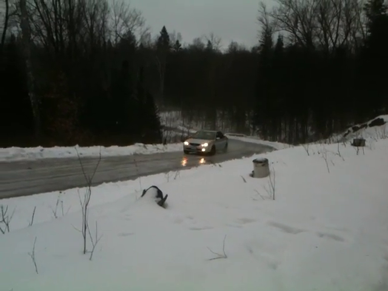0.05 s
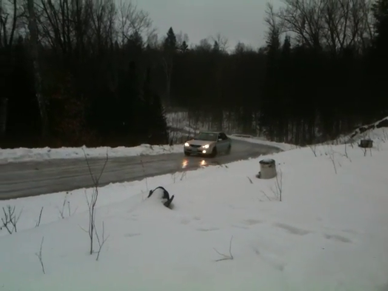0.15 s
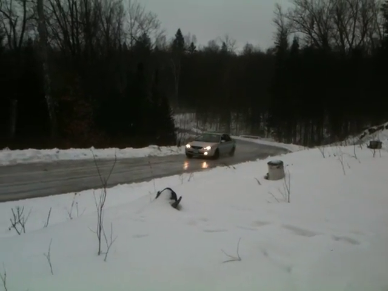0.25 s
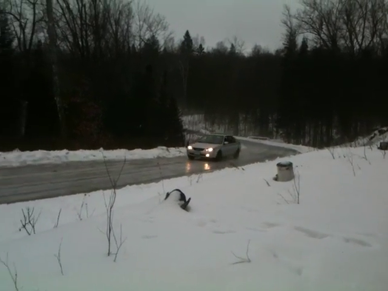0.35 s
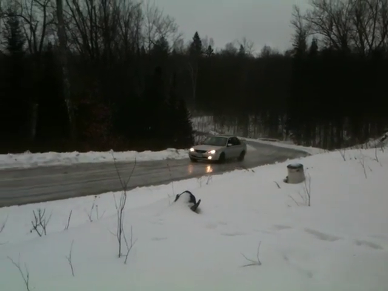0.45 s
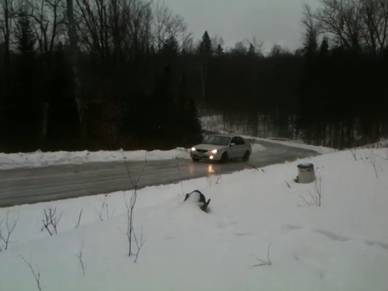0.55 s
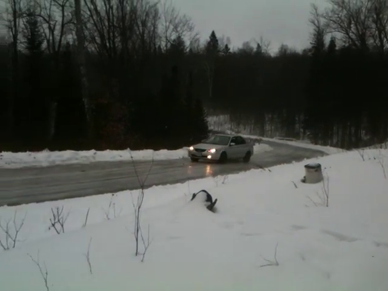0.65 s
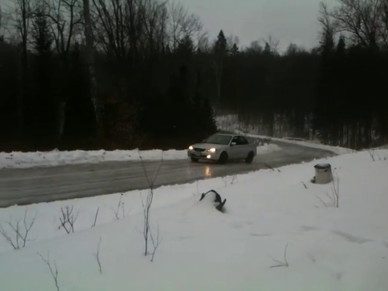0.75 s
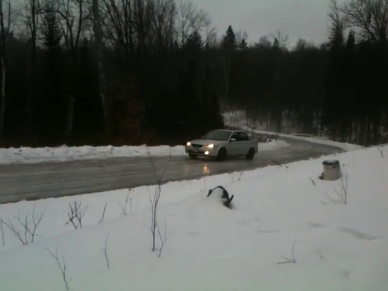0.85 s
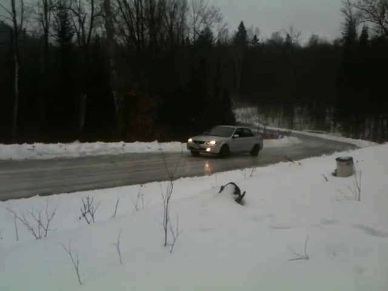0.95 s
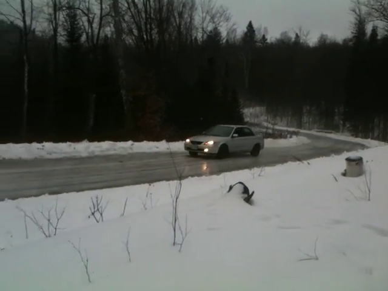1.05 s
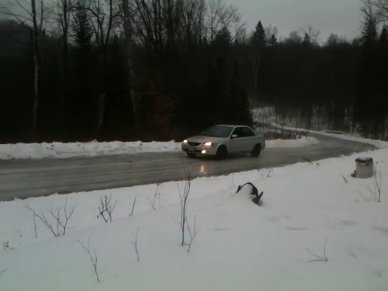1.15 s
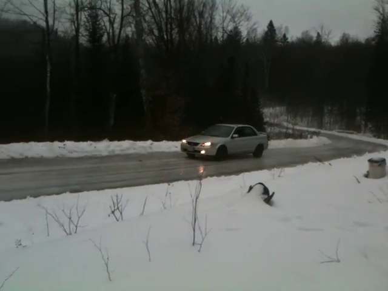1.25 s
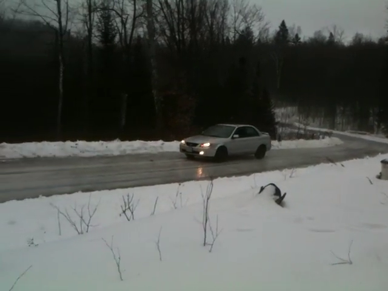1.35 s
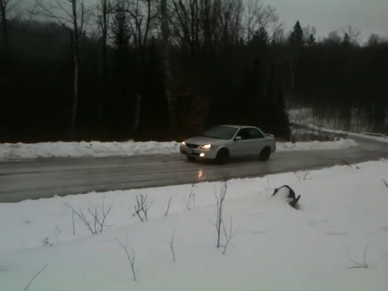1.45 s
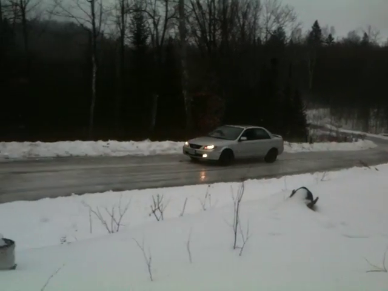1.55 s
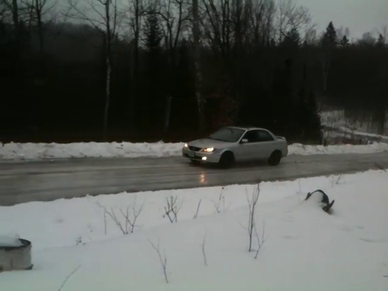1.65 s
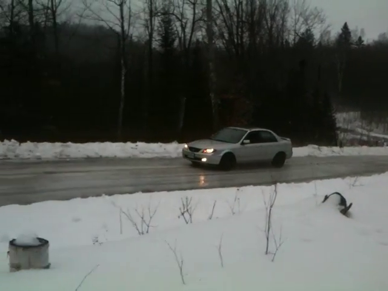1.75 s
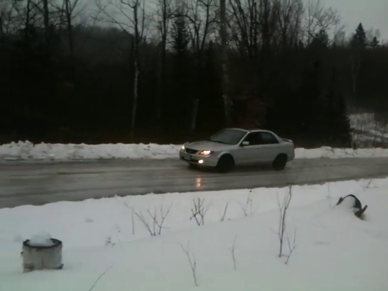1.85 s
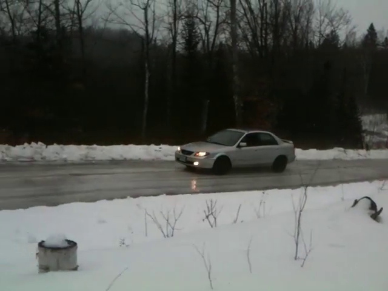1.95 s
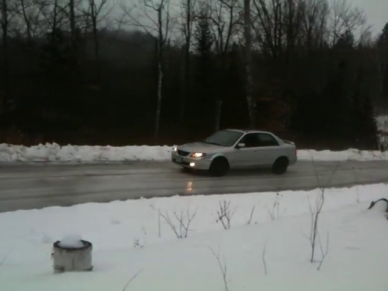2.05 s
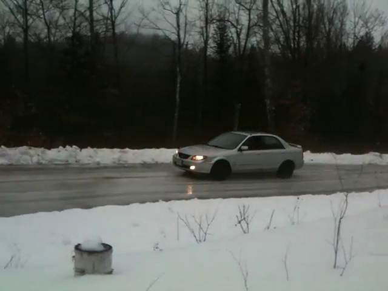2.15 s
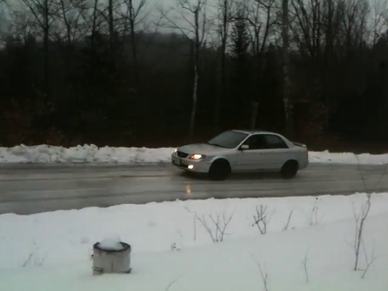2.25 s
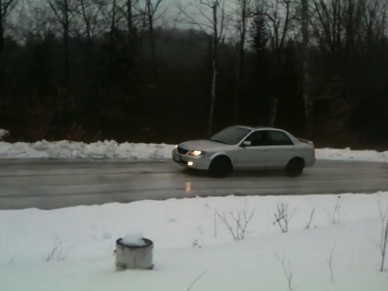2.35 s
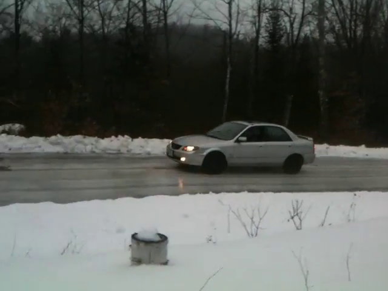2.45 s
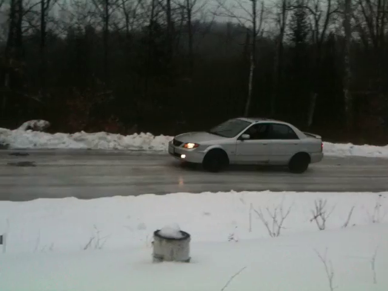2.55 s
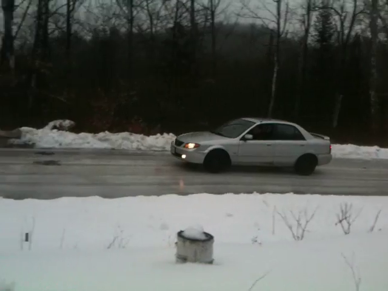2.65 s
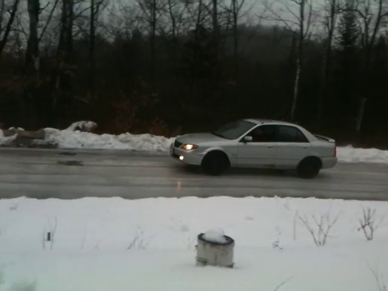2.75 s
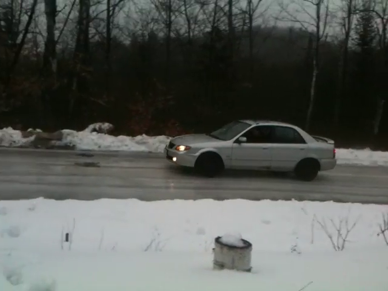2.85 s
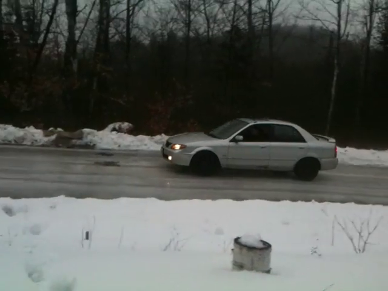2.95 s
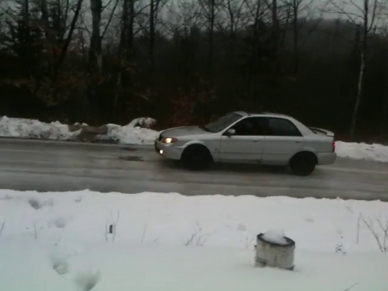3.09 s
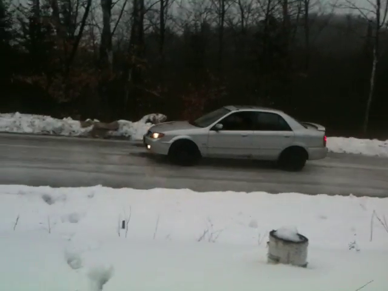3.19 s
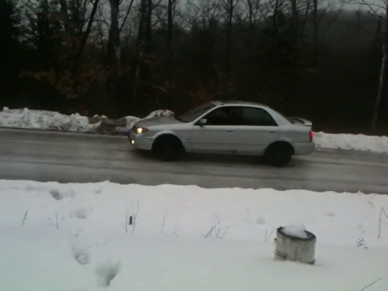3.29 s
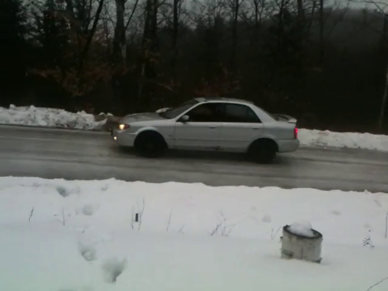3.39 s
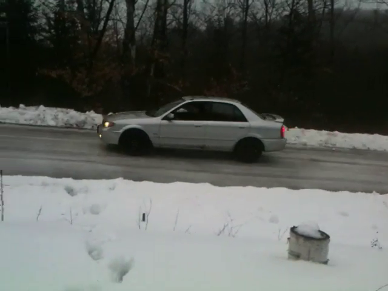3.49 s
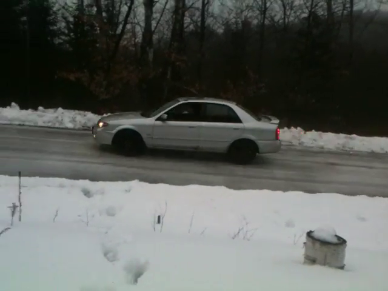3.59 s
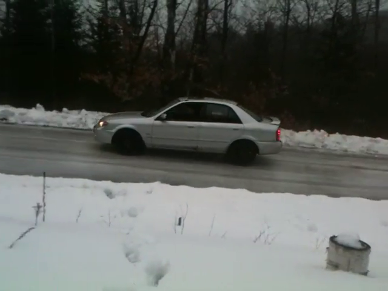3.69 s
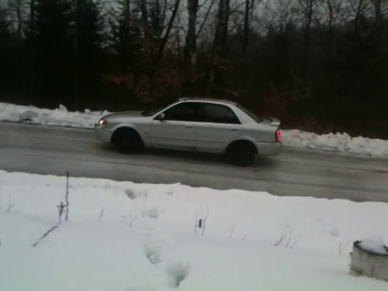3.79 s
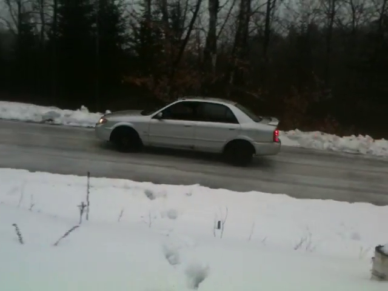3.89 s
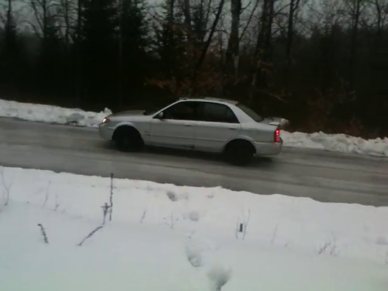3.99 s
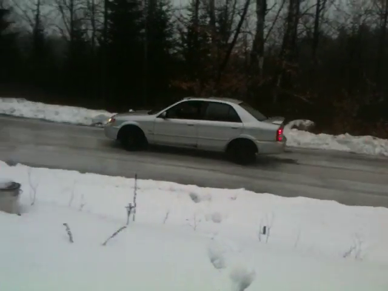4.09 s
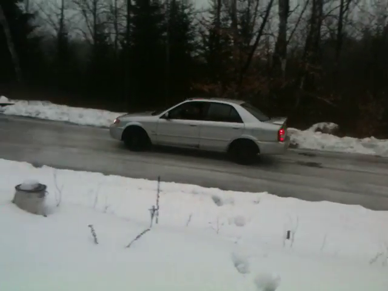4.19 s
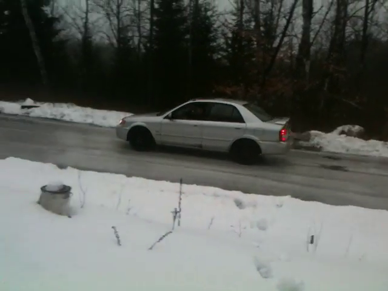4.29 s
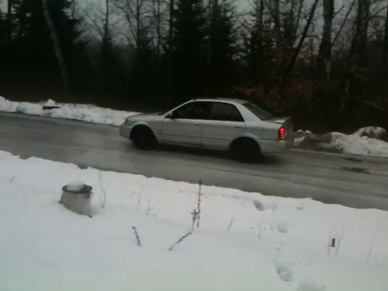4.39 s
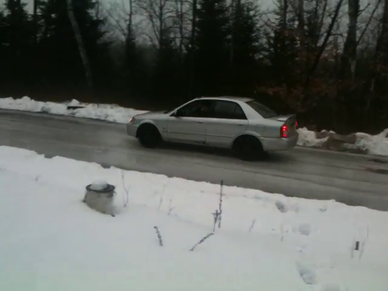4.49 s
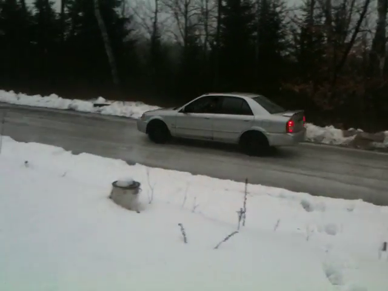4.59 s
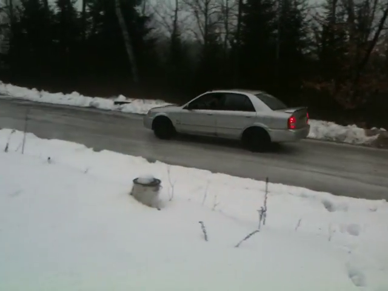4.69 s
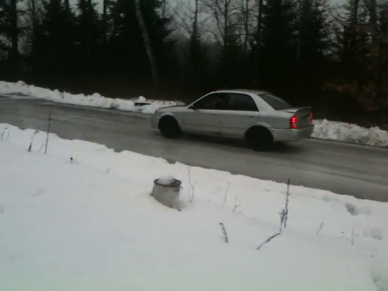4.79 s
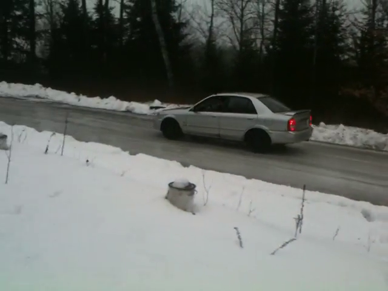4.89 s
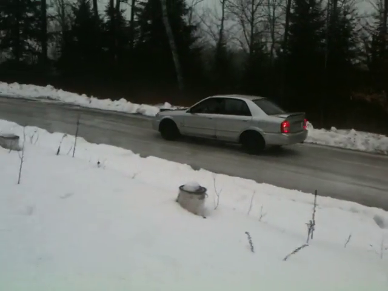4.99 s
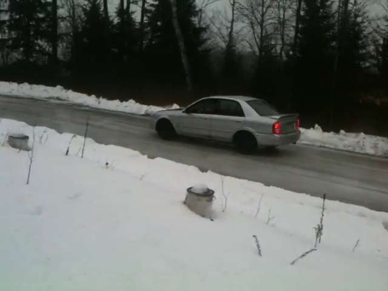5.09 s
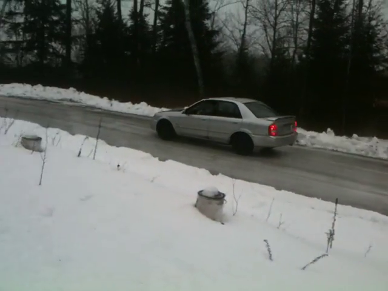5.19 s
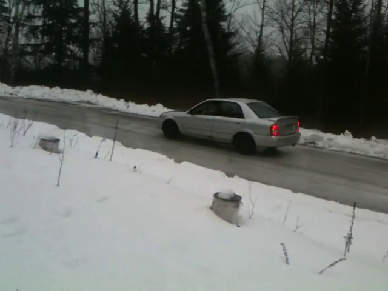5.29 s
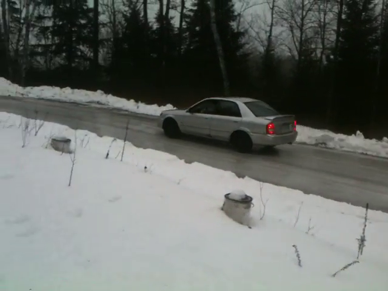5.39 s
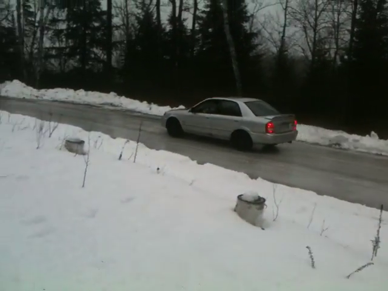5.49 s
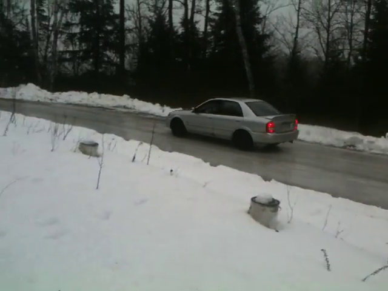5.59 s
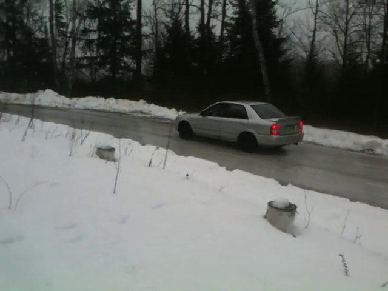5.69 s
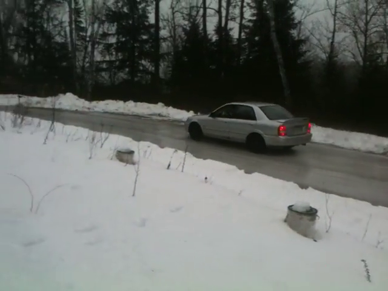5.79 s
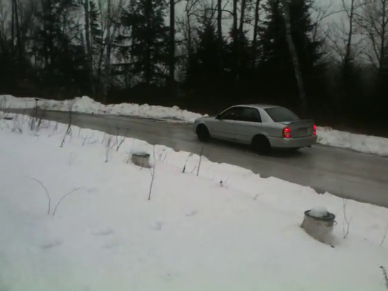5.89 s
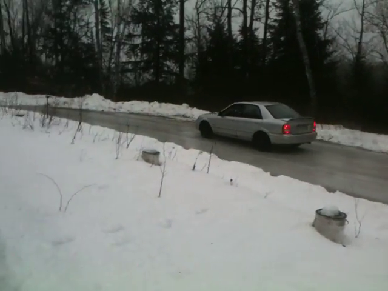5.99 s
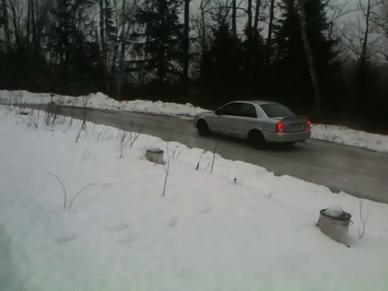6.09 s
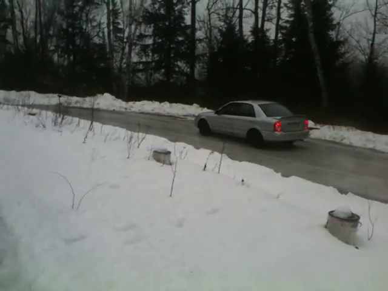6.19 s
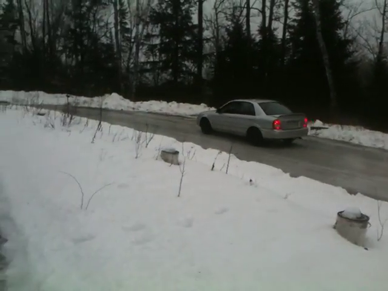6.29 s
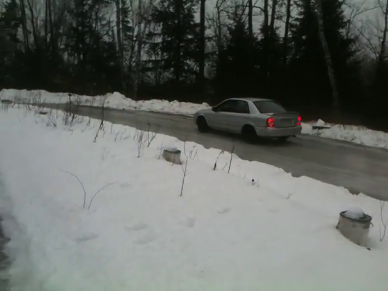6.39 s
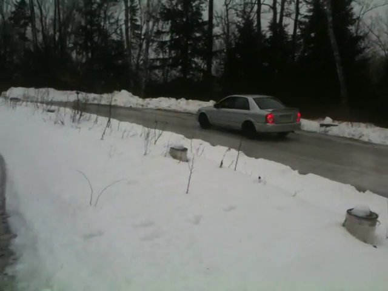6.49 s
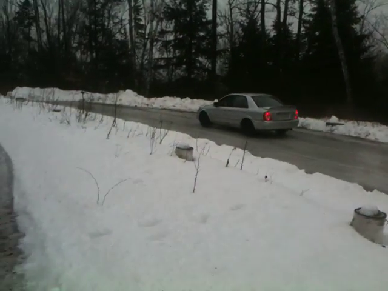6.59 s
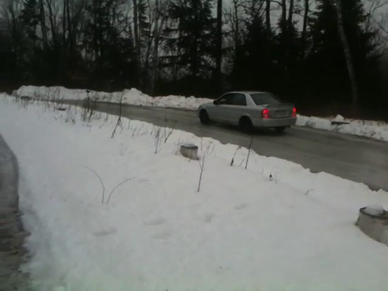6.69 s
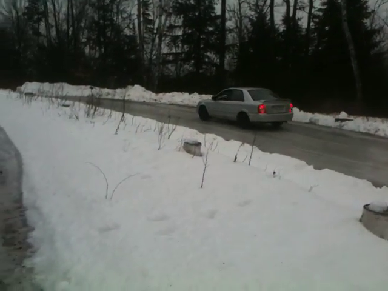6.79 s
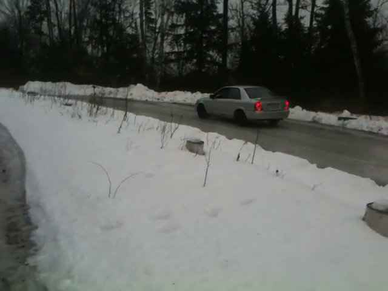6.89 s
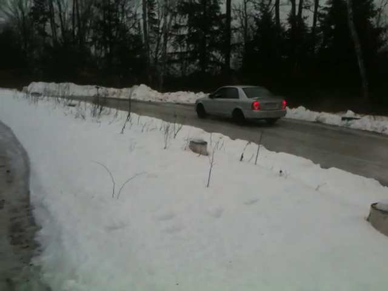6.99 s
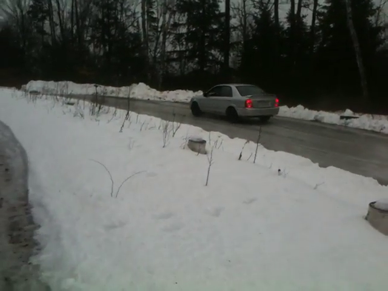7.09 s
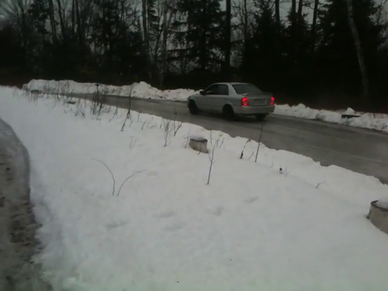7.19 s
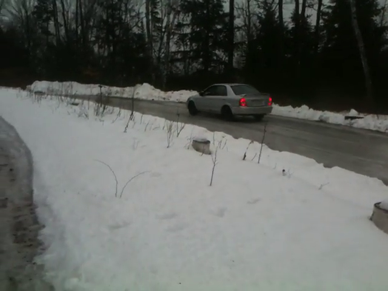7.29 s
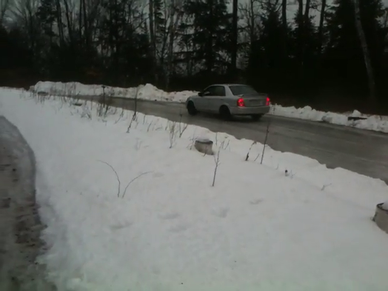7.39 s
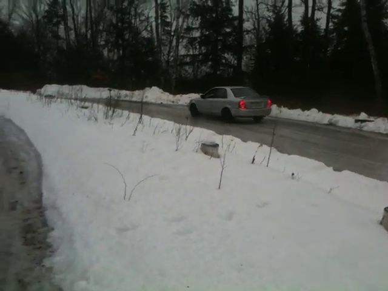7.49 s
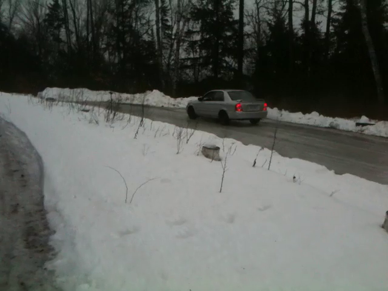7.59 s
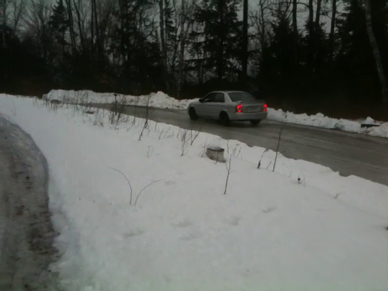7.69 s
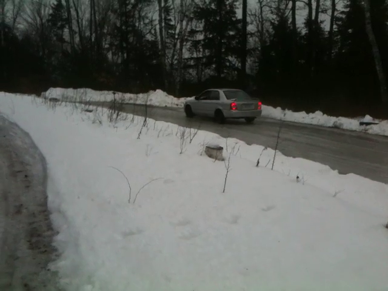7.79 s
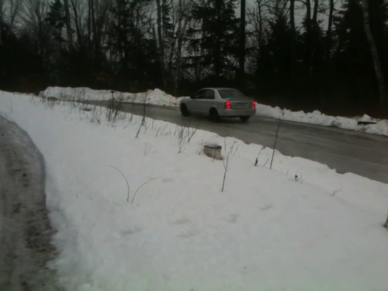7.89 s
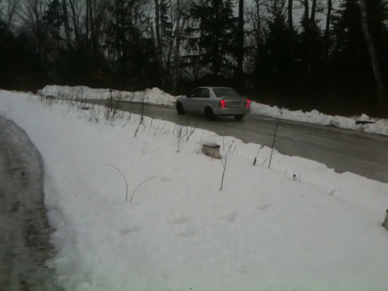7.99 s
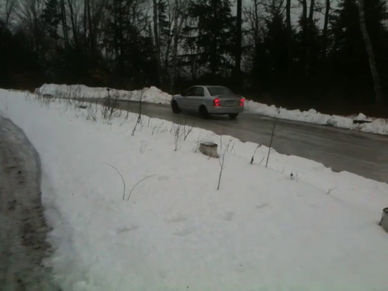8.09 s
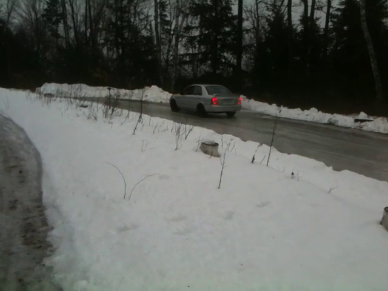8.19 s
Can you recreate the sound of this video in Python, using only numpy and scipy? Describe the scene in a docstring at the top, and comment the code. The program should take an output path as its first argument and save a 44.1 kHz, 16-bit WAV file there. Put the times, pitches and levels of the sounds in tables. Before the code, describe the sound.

Wet tyre hiss and a rough, wavering tread whine surge and fade as a car slips by on ice, with soft microphone handling thumps.

```python
"""A small car crawls past on an icy road, driven wheels spinning, heard in mono by a hand-held microphone.
From the start tread blocks whine (blurred tones), rubber scrubs and meltwater sprays (coloured noise);
the engine hums faintly (shaft orders). Soft thumps of the hand come from 1.9 s, a growl from 2.7 s and
chirps of the slowing wheel from 3.3 s. After 4 s the car is heard from behind, and a breeze rises.
Throughout, the housing cuts notches into the treble that shift as the microphone turns with the car."""
import sys
import numpy as np
from scipy import signal
from scipy.io import wavfile
from scipy.ndimage import uniform_filter1d, map_coordinates

SR = 44100
rng = np.random.default_rng(int(sys.argv[2]) if len(sys.argv) > 2 else 0)


def attenuation_scalar(level_db):
    """Turn a level in dB into a linear amplitude multiplier (20 dB per decade)."""
    decades = np.asarray(level_db, float) / 20
    return 10 ** decades


def transcribe(u):
    """Save the signal u as a 16-bit wav file named by the first command-line argument.

    u: samples, shape (n,) or (channels, n), limited to [-1, 1]; the rate is SR.
    q: integer samples, one column per channel.
    """
    v = np.clip(np.atleast_2d(u).T, -1, 1)
    q = np.round(v * 32767).astype(np.int16)
    wavfile.write(sys.argv[1], SR, q)


N = 363825
T = np.arange(N) / SR
ABREAST_S = 4


def unit(x):
    """Scaled to rms 1."""
    return x / np.sqrt(np.mean(np.abs(x) ** 2) + 1e-20)


def curves(rows, t=T):
    """One interpolated curve for each column after the time."""
    s, *columns = np.transpose(rows)
    return [np.interp(t, s, column) for column in columns]


def sided(ahead, behind, t=T):
    """One value while the car is heard from ahead, another once it is heard from behind."""
    return np.where(t < ABREAST_S, ahead, behind)


def wobble(rate_hz, size=N):
    """Smooth random curve, rate_hz knots a second."""
    knots = rng.standard_normal(int(size * np.max(rate_hz) / SR) + 4)
    position = np.cumsum(rate_hz + np.zeros(size)) / SR
    return map_coordinates(knots, [position])


def rush(spectrum, patchy_db):
    """Coloured noise of rms 1 with time-frequency patches of random gain."""
    hz, _, z = signal.stft(rng.standard_normal(N), SR, nperseg=1024)
    patches = uniform_filter1d(rng.standard_normal(z.shape), size=7, axis=0)
    patches = uniform_filter1d(patches, size=4, axis=1)
    f, db = np.transpose(spectrum)
    colour_db = np.interp(np.log(hz + 1), np.log(f), db, left=-120, right=-120)
    gain = attenuation_scalar(colour_db[:, None] + patchy_db * unit(patches))
    return unit(signal.istft(z * gain, SR, nperseg=1024)[1][:N])


def partial(hz, steady, blur_hz):
    """Tone of about rms 1 on a moving pitch; power share `steady` is clean, the rest narrow noise."""
    steady = np.clip(steady, 0, 1)
    blur = unit(wobble(blur_hz, len(hz)) + 1j * wobble(blur_hz, len(hz)))
    envelope = np.sqrt(steady) + np.sqrt(1 - steady) * blur
    return np.sqrt(2) * np.real(envelope * np.exp(2j * np.pi * np.cumsum(hz) / SR))


def notched(x, tracks, widths_hz):
    """x with moving Gaussian notches; tracks(t) gives centre [Hz] and depth [dB] of each in turn."""
    hz, t, z = signal.stft(x, SR, nperseg=1024)
    track = tracks(t)
    for centre_hz, depth_db, width_hz in zip(track[::2], track[1::2], widths_hz):
        z = z * attenuation_scalar(-depth_db * np.exp(-((hz[:, None] - centre_hz) / width_hz) ** 2))
    return signal.istft(z, SR, nperseg=1024)[1][..., :N]


def rippled(x, ripple_db):
    """Close echoes off the snow banks, as a random spectral ripple that drifts as the car moves."""
    z = signal.stft(x, nperseg=1024)[2]
    field = uniform_filter1d(rng.standard_normal(z.shape), size=3, axis=0)
    field = uniform_filter1d(field, size=90, axis=1)
    field = uniform_filter1d(field, size=3, axis=0)
    return signal.istft(z * attenuation_scalar(ripple_db * unit(field)), nperseg=1024)[1][:N]


# tyres on wet ice, following wheelspin and distance:
# (time [s], hiss [dB], scrub over hiss [dB], spray over hiss [dB])
TYRE_LEVELS = [(0, -38.5, -9, -3.5), (.15, -33.5, -6, -6.5), (.3, -37.5, -3.5, -4.5), (.46, -52, 1.5, -3),
               (.72, -48, -1, -0.5), (.88, -39.5, -4.5, -3), (1, -34.5, -6.5, -8.5), (1.15, -35, -8, -5.5),
               (1.28, -34.5, -13.5, -9.5), (1.45, -35.5, -8.5, -8.5), (1.72, -30.5, -8, -8),
               (1.97, -30.5, -5.5, -5.5), (2.14, -35, -5, -5.5), (2.4, -32, -7.5, -4),
               (2.68, -31, -3.5, -2.5), (2.82, -34.5, -7.5, -2.5), (3.12, -30.5, -4.5, -1.5),
               (3.36, -30.5, -7, -5), (3.5, -29, -6.5, -7.5), (3.65, -38, 1.5, -6.5), (3.9, -40.5, 2.5, -5),
               (4.05, -44, -3.5, -3.5), (4.3, -40.5, -7.5, -5.5), (5, -37, -7, -2.5), (5.6, -36, -7, -4),
               (6.3, -34.5, -12, -3.5), (6.7, -35.5, -15, -4), (6.82, -43, -8.5, 2.5),
               (7.25, -41, -7, -0.5), (7.33, -42.5, -12, 0), (7.47, -44.5, -12, -3), (7.55, -48, -10, -5),
               (7.62, -54.5, -11, -1.5), (7.72, -54, -12, -1.5), (7.8, -50.5, -11.5, -1.5),
               (8, -47, -8.5, -4.5), (8.2, -43.5, -6, -5), (8.25, -47.5, -9, -2)]


def tyre_levels(t=T):
    """Levels of the tyre layers before flicker and bites."""
    return curves(TYRE_LEVELS, t)


# blocks striking the ice: (time [s], block rate [Hz], song over hiss [dB], tilt [dB per multiple])
TREAD_SONG = [(0, 718, -10, 2.5), (.15, 740, -11, -2.5), (.3, 664, -10, 2), (.44, 632, -39, -4),
              (1.17, 545, -41, -3), (1.27, 550.2, -29, -7), (1.55, 637, -13.5, 10), (1.9, 735, -11.5, 1),
              (2.03, 729, -9.5, 1.5), (2.4, 807, -7, -3.5), (2.6, 817.3, -2.5, 1.5),
              (2.75, 866.5, -6, -3.5), (2.97, 983.6, -3.5, -7), (3.1, 1015, -5.5, -6),
              (3.22, 1005, -2, -8.5), (3.34, 829.5, -11, 4), (3.39, 755, -15, -3), (3.47, 576, -11, 0),
              (3.52, 521.5, -18, 2), (3.7, 520.1, -34, -5), (4.3, 380.4, -38, -2), (4.45, 392, -26, 3),
              (5.1, 528.4, -9, -0.5), (5.63, 550.2, -11.5, 0.5), (5.75, 578, -13, 10), (6, 588, -10, -1),
              (6.2, 580, -9, 0), (6.42, 564.4, -11, 7.5), (6.6, 545, -10.5, 0.5), (6.74, 565.4, -6, 5),
              (6.95, 602.3, -5.5, -1), (7.15, 638, -8.5, -2), (7.28, 658, -13, 1), (7.34, 646, -18, -3),
              (7.5, 491, -24, -12), (7.6, 476, -25, 0), (7.9, 530, -25, -11), (8.1, 540, -17, -2),
              (8.25, 545, -11, 1)]
# bands take turns: (time [s], swell of 1st, 2nd, 3rd multiple and of the slower wheel's two [dB])
BAND_SWELLS = [(2.6, -1.5, -7, 2.5, -2, 3), (2.8, -2, 0, 4, 0, -3), (2.95, -2, 3, 1, -0.5, 1),
               (3.1, -0.96, -4, -3, 2, 0), (3.2, 0.5, -3, 0, 0, 0), (3.4, 0, 2, -10, 0, 0),
               (5.5, 0, 0, -2.5, -5, 0), (5.8, 1, -1, 1.5, 4, 7), (6.1, -2.5, -0.5, 4.5, 5.5, 2),
               (6.4, 0, 2, 1, 3, -2.16), (6.53, 0, 6, -7.5, 5, -1.9), (6.65, -2.9, -3, -4.5, 1, 0),
               (6.75, 1, 2, -4.5, -4, 6.5), (6.95, 0.16, 1, 1, -7, -1), (7.25, 0.11, 0, 5, -6, 2)]
# (multiple of block rate, blur ahead [Hz], level ahead [dB], blur behind [Hz], level behind [dB])
TREAD_BANDS = [(.98, 260, 1, 260, -13.5), (2.03, 150, 3.5, 140, -1), (3.01, 180, -8.5, 115, 4.5),
               (1.47, 220, -0.5, 180, -6), (2.2, 190, -2, 170, -3)]


def song(t=T):
    """Block rate [Hz] and band levels [dB]: hiss level, song, tilt, swell and the side heard."""
    block_hz, over_db, tilt_db = curves(TREAD_SONG, t)
    song_db = tyre_levels(t)[0] + over_db
    levels_db = []
    for (k, _, ahead_db, _, behind_db), swell_db in zip(TREAD_BANDS, curves(BAND_SWELLS, t)):
        levels_db.append(song_db + tilt_db * (k - 2) + swell_db + sided(ahead_db, behind_db, t))
    return block_hz, levels_db


def tread(bite_db, grip):
    """Uneven block spacing blurs each multiple of the block rate into a rough band that comes and goes."""
    block_hz, levels_db = song()
    bands = 0
    for (k, ahead_hz, _, behind_hz, _), db in zip(TREAD_BANDS, levels_db):
        gain = attenuation_scalar(db + 1.4 * wobble(5.5) + 2.07 * wobble(30))
        bands += gain * partial(k * block_hz, sided(0.08, 0.25), blur_hz=sided(ahead_hz, behind_hz))
    return attenuation_scalar(0.88 * bite_db + 0.46 * grip) * bands


# scrub colour: (frequency [Hz], relative density [dB per Hz])
SCRUB_COLOUR = [(220, -46), (380, -49), (419, -23), (723, -2), (960, -1), (1040, -0.5), (1300, -4),
                (1690, -7), (2860, -120)]


def scrub(scrub_bite_db, grip):
    """Rubber scrubbing on ice: patchy mid-band noise that follows the grip."""
    hiss_db, over_db, _ = tyre_levels()
    level_db = hiss_db + over_db + scrub_bite_db + 1.0 * grip + 0.69 * wobble(25)
    return attenuation_scalar(level_db) * rush(SCRUB_COLOUR, patchy_db=2.5)


# broad humps of the spinning tyre: (time [s], hiss hump [Hz], its blur [Hz], level over hiss [dB],
# spray hump [Hz], level over spray [dB])
TYRE_HUMPS = [(0, 1498, 640, -18.5, 4150, -15), (1, 1554, 695.5, -5.5, 4120, -19),
              (1.3, 1405, 498, -15, 4090, -12), (1.9, 1412, 640.4, -8.5, 3806, -6.5),
              (2.5, 1845, 647.7, 0.5, 4200, -6), (3.2, 1508, 640.6, -8, 4250, -1),
              (3.8, 1501, 644, -19, 4290, -13), (4.2, 1848, 300, -6.5, 4550, -7),
              (4.55, 1864, 278.6, -3, 4726, -11), (4.8, 2057, 499.3, -4, 4750, -8),
              (5.1, 2165, 599.1, -1.5, 4770, -7.5), (6, 2347, 637, -7, 4724, -8.5),
              (6.7, 2252, 635.2, -1, 4644, -8.5), (7.3, 2425, 644, -5, 4620, -13),
              (8.25, 2140, 632, -10.5, 4603, -4)]


def humps():
    """Hump of the hiss and hump of the spray, each a band of narrow noise on a moving centre."""
    low_hz, low_blur_hz, low_db, high_hz, high_db = curves(TYRE_HUMPS)
    low = attenuation_scalar(low_db) * partial(low_hz, steady=0, blur_hz=low_blur_hz)
    high = attenuation_scalar(high_db) * partial(high_hz, steady=0, blur_hz=sided(550, 380))
    return low, high


def valley(t):
    """While the third multiple sings, the tread pattern leaves a quiet lane just below it."""
    block_hz, levels_db = song(t)
    return 2.62 * block_hz, np.clip(0.11 * (levels_db[2] + 75.0), 0, 8)


# hiss colour: (frequency [Hz], relative density [dB per Hz])
HISS_COLOUR = [(650, -19.5), (1100, -11.5), (1200, -2.5), (1460, -2.5), (1810, 2.5), (2460, -5.5),
               (3000, -17), (3900, -22), (6600, -120)]
# sizzle, strongest from behind the wheel: (time [s], centre [Hz], level over hiss [dB])
SIZZLE_TRACK = [(0, 2607, -17), (1, 2707, -31), (3.9, 2580, -33), (4.3, 2595, -20), (5, 2694, -11),
                (6, 2943, -11.5), (6.5, 2790, -9), (7, 2895, -9), (7.6, 2900, -17), (8.25, 2800, -16)]


def hiss(hump, bite_db, grip):
    """Tyre hiss: coloured noise and its hump, cut by the quiet lane, plus a band of sizzle."""
    sizzle_hz, sizzle_db = curves(SIZZLE_TRACK)
    body = notched(attenuation_scalar(-2.5) * rush(HISS_COLOUR, patchy_db=2.0) + hump, valley, widths_hz=[170])
    sizzle = attenuation_scalar(sizzle_db) * partial(sizzle_hz, steady=0, blur_hz=560)
    level_db = tyre_levels()[0] + bite_db + 0.35 * grip + 0.53 * wobble(30)
    return attenuation_scalar(level_db) * (body + sizzle)


# spray colour: (frequency [Hz], relative density [dB per Hz])
SPRAY_COLOUR = [(1940, -19.5), (3300, -8.5), (4130, 0), (4400, -3), (4770, -0.5), (5650, -7), (7290, -8.5),
                (9800, -15), (12700, -48), (21600, -120)]


def spray(hump, bite_db, grip):
    """Meltwater thrown off the tyre: bright patchy noise and its hump."""
    hiss_db, _, over_db = tyre_levels()
    body = attenuation_scalar(-0.95) * rush(SPRAY_COLOUR, patchy_db=1.46) + hump
    return attenuation_scalar(hiss_db + over_db + 0.23 * bite_db + 0.55 * grip + 0.54 * wobble(40)) * body


# finest spray: (time [s], level before the 2 dB lift [dB])
MIST_LEVEL = [(0.0, -60.5), (0.6, -64), (0.85, -53), (2.44, -51), (2.69, -44.5), (2.8, -48), (3.24, -41),
              (3.28, -47), (3.47, -44), (3.58, -53.5), (4.39, -54.5), (4.8, -50.5), (5.93, -51),
              (7.33, -60.5), (7.65, -69), (8.25, -64)]
# mist colour: (frequency [Hz], relative density [dB per Hz])
MIST_COLOUR = [(5470, -5.5), (9300, -3.5), (10200, -3.5), (11700, -8), (12700, -8), (13300, -16),
               (14100, -9.5), (15100, -11.5), (15750, -22)]


def mist(bite_db, grip):
    """Finest spray: noise in the top treble."""
    level_db = curves(MIST_LEVEL)[0] + 2.0 + 0.27 * bite_db + 0.49 * grip + 0.69 * wobble(17)
    return attenuation_scalar(level_db) * rush(MIST_COLOUR, patchy_db=0.0)


# engine: (time [s], crankshaft rate [Hz], hum [dB])
ENGINE_TRACK = [(0, 36.74, -76), (1, 36.6, -83), (1.3, 34.48, -82), (1.7, 38.7, -71), (2.1, 37.48, -65.5),
                (2.45, 37.98, -68.5), (2.8, 37.37, -68), (3.1, 40.86, -61), (3.42, 47.11, -73),
                (3.6, 40, -74.5), (4.3, 39.43, -67), (5.5, 38.7, -71), (6, 37.95, -74), (6.6, 36.55, -77),
                (6.9, 36.53, -74), (7.3, 38.47, -78), (7.5, 35.2, -89), (8.25, 34.47, -79)]
# shaft orders: (multiple of crankshaft rate, level ahead [dB], level behind [dB])
SHAFT_ORDERS = [(2, -16, -8), (3, -14, -10), (4, -2, -3), (5, -12, -8), (6, -4.5, -4), (7, -9, -7),
                (8, -23, -12)]


def hum():
    """Engine hum: wavering multiples of the crankshaft rate."""
    shaft_hz, hum_db = curves(ENGINE_TRACK)
    orders = 0
    for k, ahead_db, behind_db in SHAFT_ORDERS:
        gain = attenuation_scalar(sided(ahead_db, behind_db) + 2.7 * wobble(2.7))
        orders += gain * partial(k * shaft_hz, steady=0.86, blur_hz=8.7)
    return attenuation_scalar(hum_db) * orders


# drone: (time [s], pitch [Hz], level [dB])
DRONE_TRACK = [(0, 300, -81), (.9, 300, -72), (1.3, 277, -70.5), (1.7, 310, -63.5), (2.1, 297.8, -62.5),
               (2.4, 305.7, -67), (2.7, 292, -70), (3.15, 300, -64), (3.4, 295, -82), (4.2, 285, -83),
               (4.7, 281, -76), (5.9, 279.5, -75), (6.4, 277.8, -73), (6.9, 280, -80), (7.5, 276.6, -77),
               (7.8, 273.8, -78), (8.1, 266.2, -76)]


def drone():
    """A tone that wavers near one pitch."""
    hz, db = curves(DRONE_TRACK)
    tone = partial(hz + 1.374 * wobble(3), steady=0.74, blur_hz=7.6)
    return attenuation_scalar(db + 2.49 * wobble(4)) * tone


# low rumble: (time [s], level before the 3.5 dB lift [dB])
RUMBLE_LEVEL = [(0.0, -65), (0.48, -66), (1.47, -62.5), (1.79, -59), (3.42, -60.5), (3.7, -56.5),
                (4.57, -62.5), (6.2, -62.5), (6.36, -60), (6.98, -68), (7.74, -70), (8.25, -69.5)]
# rumble colour: (frequency [Hz], relative density [dB per Hz])
RUMBLE_COLOUR = [(15, -66), (25, -41), (43, -42), (84, -23), (134, -7), (289, -0.5), (390, -5), (440, -1.5),
                 (570, 2.5), (970, -120)]


def rumble():
    """Low road rumble: slowly wavering noise."""
    return attenuation_scalar(curves(RUMBLE_LEVEL)[0] + 3.5 + 2.0 * wobble(6)) * rush(RUMBLE_COLOUR, patchy_db=1.0)


# breeze: (time [s], level [dB])
BREEZE_LEVEL = [(0, -76), (4.1, -73), (4.4, -61.5), (5.1, -66.5), (5.9, -69), (6.1, -83), (8.25, -90.5)]
# buffet colour: (frequency [Hz], relative density [dB per Hz])
BUFFET_COLOUR = [(40, -40), (65, -12), (100, 0.5), (160, -2), (240, -11), (400, -60)]


def breeze():
    """A breeze buffets the microphone: unsteady low noise."""
    return attenuation_scalar(curves(BREEZE_LEVEL)[0] + 3.0 * wobble(18)) * rush(BUFFET_COLOUR, patchy_db=2.0)


# the spinning tyre bites through to rougher ice, or briefly skates (negative):
# (time [s], length [s], rise of hiss [dB], rise of scrub [dB])
TYRE_BITES = [(0.191, 0.063, 6.5, 3), (0.23, 0.066, 0.5, 9.5), (0.285, 0.027, 4, 9.5),
              (1.151, 0.09, 3.5, 5), (1.642, 0.054, -9, -0.5), (1.685, 0.044, 1, 4),
              (1.82, 0.064, -0.5, 10), (2.332, 0.058, 1.5, 5.5), (2.46, 0.035, -7, -8),
              (2.489, 0.06, -2.5, 7.5), (2.601, 0.055, 4.5, 5), (2.648, 0.044, 2.5, 8.5),
              (2.714, 0.045, 5, 4.5), (2.858, 0.027, 4.5, 3), (2.901, 0.045, 5, 12), (2.97, 0.021, 1, 7),
              (3.003, 0.028, -11, -21), (3.053, 0.038, 7, 6), (3.107, 0.03, 5.5, 5), (3.15, 0.03, 1, 4),
              (3.186, 0.043, 6, 0), (3.215, 0.05, 3, 16.5), (3.379, 0.035, -1, -13), (3.41, 0.042, 6, 10),
              (3.513, .05, -4, 2), (3.792, 0.021, 5.5, -11), (4.301, 0.049, 3, 7.5), (5.06, 0.103, 2, 10),
              (5.094, 0.031, 5, -4), (5.177, 0.034, 3.5, 5), (5.701, 0.031, 3, 9), (5.863, 0.055, 1.5, 4),
              (5.972, 0.046, 5, 9.5), (6.114, 0.039, 4.5, 7), (6.26, 0.047, 2, 8), (6.398, 0.029, 4, 3),
              (6.497, 0.045, 1.5, 5), (6.727, 0.075, 3.5, 9), (6.836, 0.032, 7, -5), (7.03, 0.038, 4, -4)]


def bites():
    """Rise of hiss and of scrub [dB]: one Gaussian bump for each bite."""
    rise_db = np.zeros((2, N))
    for s, length_s, *db in TYRE_BITES:
        near = slice(max(round((s - length_s) * SR), 0), round((s + length_s) * SR))
        bump = np.exp(-(3.7 * (T[near] - s) / length_s) ** 2)
        rise_db[:, near] += np.outer(db, bump)
    return rise_db


# grip on the housing: (time [s], push gain before the 3 dB cut [dB], pitch [Hz])
HAND_THUMPS = [(1.878, -51, 161), (2.162, -35.5, 140), (2.349, -48, 132), (2.76, -44, 209.1),
               (3.508, -47, 151), (4.45, -43, 100), (4.668, -49, 130.4), (4.737, -43, 140), (4.8, -47, 165),
               (4.838, -41, 124), (4.881, -43, 131), (4.961, -37, 118), (5.058, -56, 135),
               (5.157, -42, 148), (5.24, -54, 105), (5.358, -56, 142), (5.592, -46, 124), (5.749, -46, 127),
               (5.878, -46, 121.6), (6.891, -54, 120), (7.11, -54, 110.5), (7.964, -49, 120)]


def thumps():
    """Each shift of the hand is a soft low push of about two cycles."""
    out, t = np.zeros(N + SR), np.arange(SR // 10) / SR
    u = t / 0.0043  # envelope peaks at 4.3 ms
    for s, db, hz in HAND_THUMPS:
        push = u * np.exp(1 - u) * np.sin(2 * np.pi * hz * t)
        out[round(s * SR):][:len(t)] += attenuation_scalar(db - 3.0) * push
    return notched(out[:N], lambda t: [0, 42], widths_hz=[62])  # the microphone's bass cut


# growl: (time [s], centre [Hz], level [dB])
GROWL_TRACK = [(2.65, 330, -87), (2.78, 300, -53), (2.95, 290, -67), (3.35, 560, -78), (3.45, 520, -49),
               (3.6, 330, -56), (3.75, 250, -54.5), (4.1, 250, -69), (4.35, 225, -54.5), (4.6, 200, -78)]


def growl():
    """A low band of narrow noise that sinks as the wheel regains grip."""
    hz, db = curves(GROWL_TRACK)
    return attenuation_scalar(db) * partial(hz, steady=0, blur_hz=140)


# the slowing wheel slips and catches: (time [s], length [s], start [Hz], end [Hz], level [dB])
WHEEL_CHIRPS = [(3.31, 0.053, 1794, 1715, -32), (3.383, .095, 2264, 1696, -31),
                (3.395, 0.033, 1530, 1420, -30), (3.403, .06, 1350, 1290, -35),
                (3.398, 0.089, 1023, 820, -33.5), (3.4, 0.072, 744, 615, -41), (3.47, .06, 1520, 1380, -40),
                (3.48, .085, 1120, 820, -29.5), (3.502, .07, 2050, 1850, -40), (3.537, .14, 784, 569, -42),
                (3.589, 0.11, 1574, 1335, -39), (3.574, .1, 1050, 860, -48), (3.695, 0.081, 1060, 846, -35),
                (3.762, 0.116, 1370, 1270, -40), (3.77, 0.054, 1980, 1740, -43),
                (3.82, .2, 830, 988, -41.5), (4.498, 0.15, 1200, 1260, -48), (4.8, 0.1, 1076, 1005, -45)]


def chirps():
    """Each chirp is a narrow rough band that glides, swelling and fading once."""
    out = np.zeros(N)
    for s, length_s, start_hz, end_hz, db in WHEEL_CHIRPS:
        along = np.linspace(0, 1, round(length_s * SR))
        glide = partial(start_hz + along * (end_hz - start_hz), steady=0.35, blur_hz=105)
        swell = np.sqrt(np.abs(np.sin(np.pi * along)))
        out[round(s * SR):][:len(along)] += attenuation_scalar(db) * swell * glide
    return out


def tyres():
    """Grip comes and goes: tread, scrub, hiss, spray and mist flicker together and each by itself."""
    bite_db, scrub_bite_db = bites()
    grip = 0.92 * wobble(16) + 0.38 * wobble(35) + 0.47 * wobble(90)
    hiss_hump, spray_hump = humps()
    wet = rippled(hiss(hiss_hump, bite_db, grip) + spray(spray_hump, bite_db, grip), ripple_db=2.0)
    fine = rippled(mist(bite_db, grip), ripple_db=3.5)
    return tread(bite_db, grip) + scrub(scrub_bite_db, grip) + wet + fine + chirps()


def scene():
    """One microphone feeds both channels."""
    mono = tyres() + hum() + drone() + rumble() + breeze() + thumps() + growl()
    return np.tile(mono, (2, 1))


def roll_off(x):
    """The treble ends steeply here."""
    return signal.sosfilt(signal.butter(12, 15670, fs=SR, output="sos"), x)


# housing and ground echo as the microphone turns:
# (time [s], then centre [Hz] and depth [dB] of five notches)
HEADING_NOTCHES = [(1, 3060, 8.4, 5270, 4, 8950, 1, 10960, 45, 13900, 8),
                   (3.2, 3178, 21, 5800, 4, 8300, 1.9, 11400, 15, 14000, 5.3),
                   (3.6, 3138, 9.5, 5530, 9.2, 8200, 11, 12100, 9.2, 14020, 5),
                   (6.3, 3140, 26, 5870, 2.8, 8600, 4.9, 11600, 25, 14300, 17),
                   (6.6, 3220, 14, 5953, 4.14, 9700, 11.7, 11480, 5.4, 14080, 14.3)]


def record(dry):
    """Five notches slide with the heading; one low dip stays put."""
    heard = notched(dry, lambda t: curves(HEADING_NOTCHES, t) + [410, 5],
                    widths_hz=(86.5, 107, 180, 300, 400, 46.4))
    return roll_off(heard)


dry = scene()
out = record(dry)
transcribe(out)
```